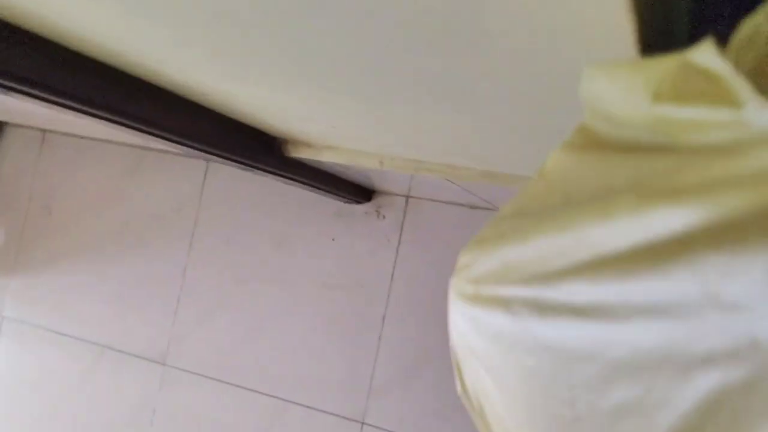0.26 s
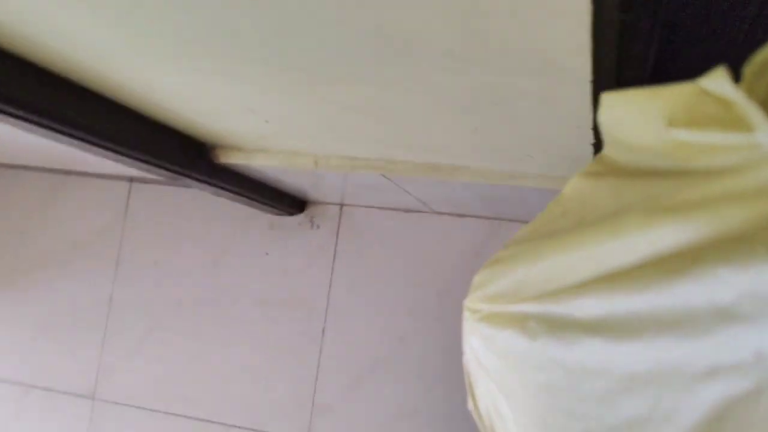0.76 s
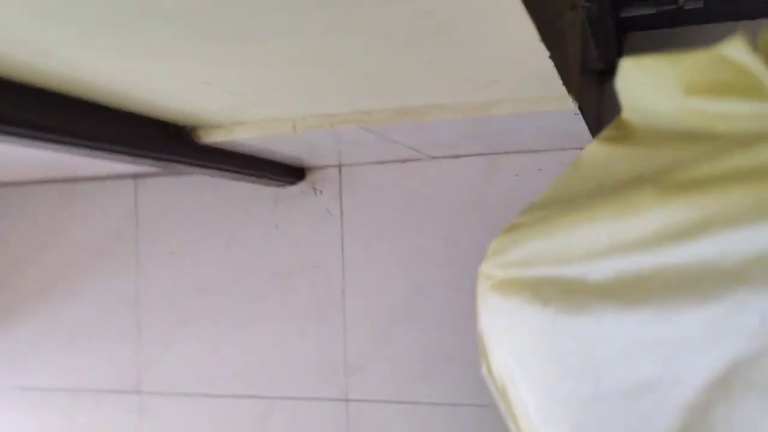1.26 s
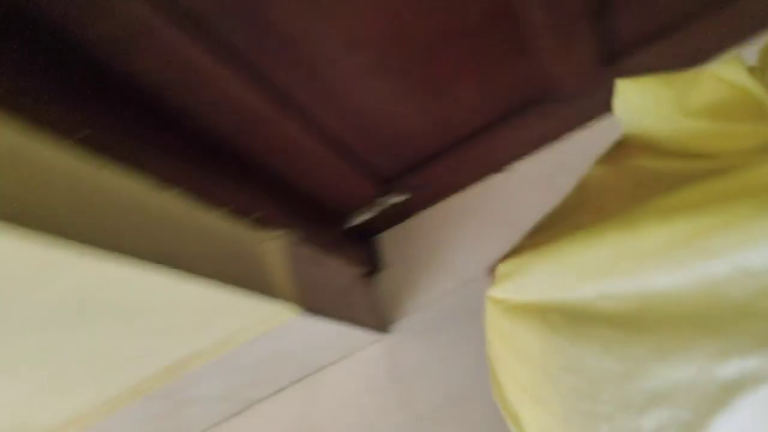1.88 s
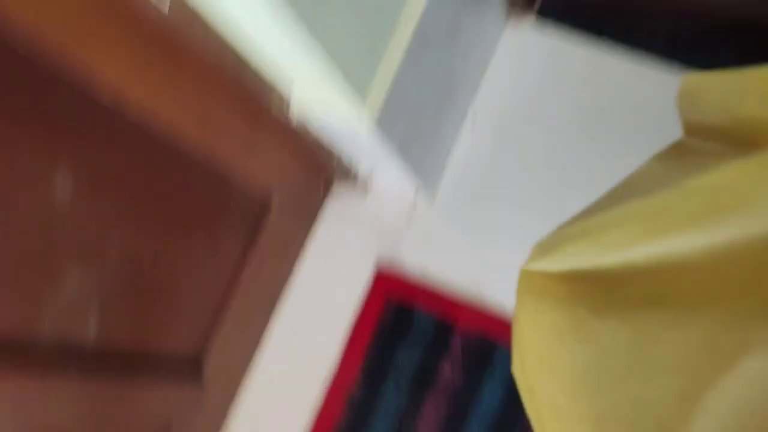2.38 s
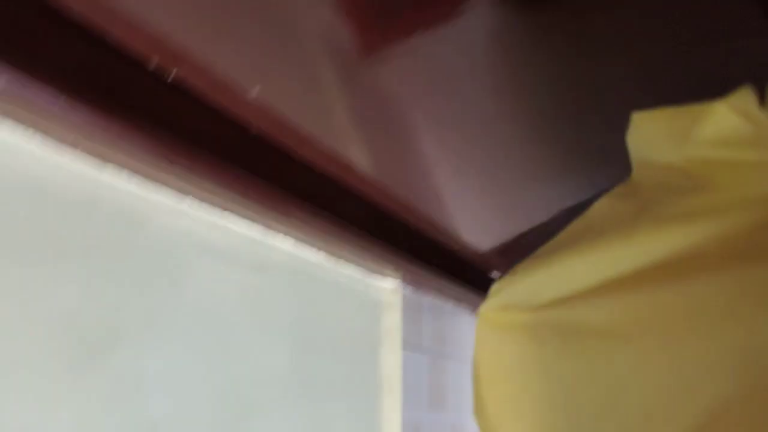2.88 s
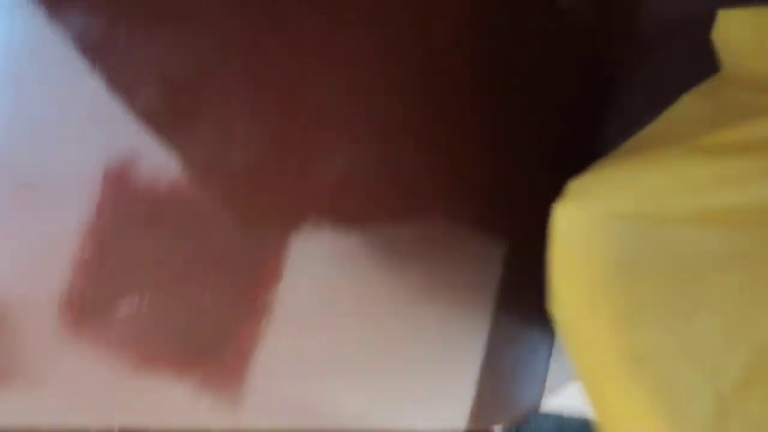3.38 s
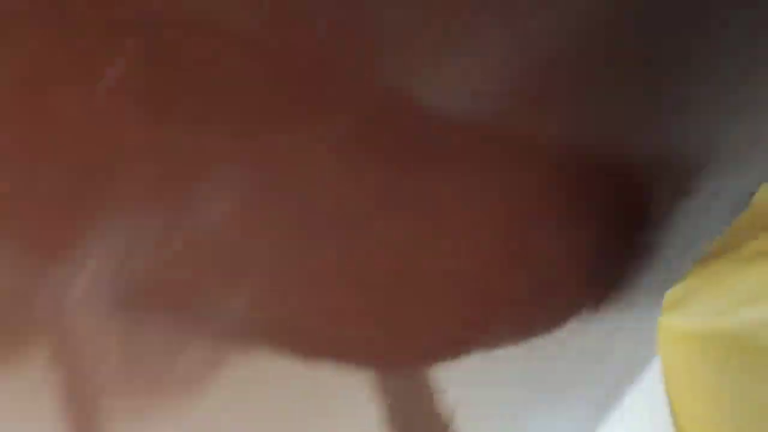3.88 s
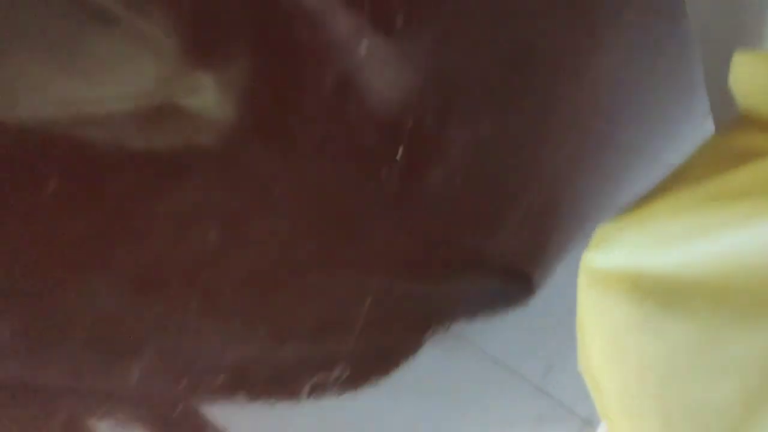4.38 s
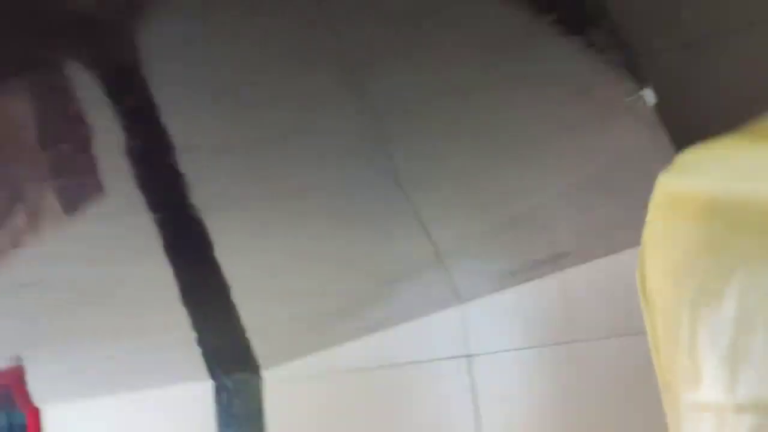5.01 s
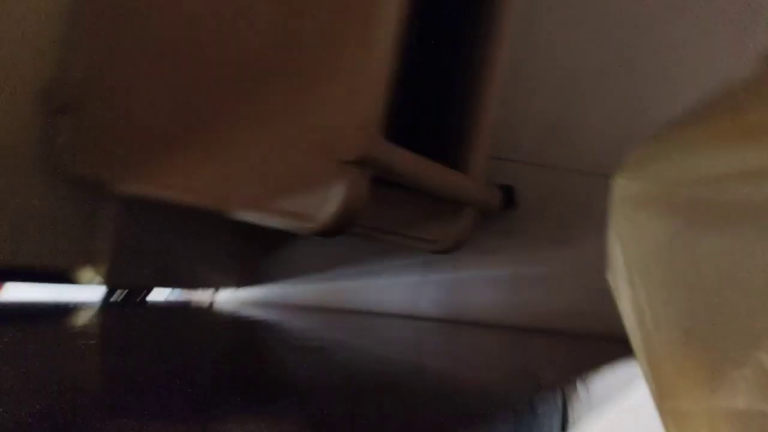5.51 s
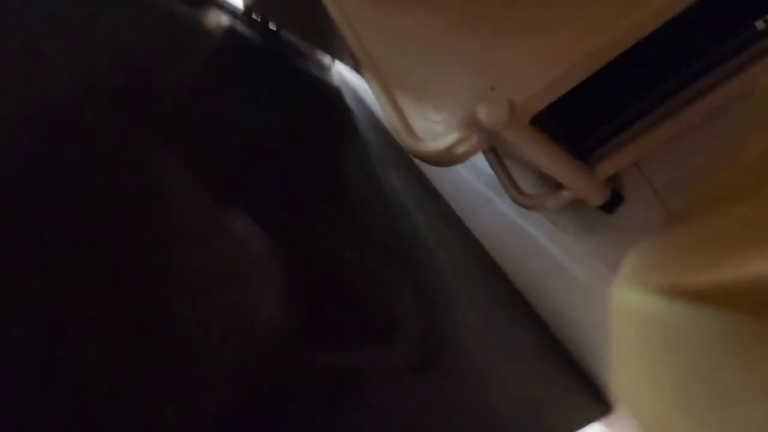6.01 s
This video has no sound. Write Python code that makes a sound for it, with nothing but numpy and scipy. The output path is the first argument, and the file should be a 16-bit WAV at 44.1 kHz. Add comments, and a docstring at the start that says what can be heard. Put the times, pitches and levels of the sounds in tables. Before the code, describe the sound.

Cloth rasps at the microphone, a latch snaps and a wooden door bangs in a tiled hall, its bolt grinds home, then keys jingle faintly.

```python
"""Doors and keys in a tiled hall

A latch snaps, a wooden door bangs shut, its bolt grinds home and a second door bumps: rattles plus ringing modes.
Keys jangle as knocked modes; a cloth bag rubs, swishes and crackles at the microphone as filtered slip noise.
Random echoes make the hall; low swells, soft thumps, rumble and air noise lie underneath."""
import sys
import numpy as np
from scipy import signal
from scipy.fft import rfft, irfft
from scipy.io import wavfile
from scipy.ndimage import uniform_filter1d

SR = 44100
rng = np.random.default_rng(int(sys.argv[2]) if len(sys.argv) > 2 else 0)


def transcribe(signal):
    """Save signal, clipped to [-1, 1], as a 16-bit WAV file at the path in sys.argv[1]."""
    frames = np.atleast_2d(signal).T
    limited = np.clip(frames, -1, 1)
    pcm = np.round(limited * 32767).astype(np.int16)
    wavfile.write(sys.argv[1], SR, pcm)


N = 275625
TIME = np.arange(N) / SR
PORT_LAG = 14  # samples, left port behind right

# modes of the struck parts: pitch_hz, level_db, t60_s
LATCH = [(2013, -9, .07), (2676, -10, .07), (5600, -7, .03), (6298, -3, .06), (6600, 0, .12),
         (6858, 0, .14), (7050, -7, .06), (13490, -13, .05)]
DOOR = [(54, -17, .6), (132, -2, .5), (180, -1, .38), (221, 1, .42), (258, -6, .3), (328, -9, .4),
        (470, -7, .25), (630, -11, .35), (732, -9, .35), (824, -9, .35), (915, -7, .27)]
SECOND_DOOR = [(87, 0, .42), (91, -4, .36), (188, -9, .25), (323, -22, .3), (420, -16, .25),
               (495, -18, .25)]
FRAME = [(272, 0, 0.22), (310.2, -4.5, 0.26), (847, 1, .12)]
STRIKE_PLATE = [(3780, -7.5, 0.038), (4270, 1.5, 0.022), (4960, -2, 0.059), (5100, -2.5, .025),
                (5710, -9, 0.039), (6460, -15.5, .03)]
BOLT = [(2150, -4, .022), (2350, 0, .025), (2560, -1, .022), (2850, -5, .02)]
# short rattle of wood and metal in every blow: freq_hz, density_db_per_hz
RATTLE = [(45, -6), (120, 0), (300, -5), (600, 0), (1200, -1.5), (2500, -4.5), (5000, -17), (12000, -24)]
# blows on doors and lock:
# start_s, rattle_db, hardness_db_per_octave, fade_s, left_right_db, ring_db, part
DOOR_BLOWS = [(0.7324, -13, 2.4, 0.0075, -9, -25.5, LATCH), (.767, -25, -3.5, 0.0089, -5, -26.5, FRAME),
              (0.9715, -11.5, 0.5, 0.011, -6, -24, FRAME), (.995, -10, -2, 0.014, -0.5, -15, DOOR),
              (1.0182, -14, -2, .01, -6, -15, STRIKE_PLATE), (1.4097, -12, 1.8, 0.0058, -2.5, -11.5, BOLT),
              (2.7214, -18, 4, 0.0049, 1, -21, SECOND_DOOR), (2.725, -19, -3, .014, -3.5, -22.5, BOLT)]


def doors():
    """Each blow rattles, brighter the harder the contact, and leaves a part ringing; returns both layers."""
    rattles, rings = np.zeros((2, N)), np.zeros((2, N))
    t = np.arange(8192) / SR
    for start_s, rattle_db, hardness_db, fade_s, pan_db, ring_db, part in DOOR_BLOWS:
        spectrum = [(hz, band_db + hardness_db * np.log2(hz)) for hz, band_db in RATTLE]
        rattle = evened(colour(rng.standard_normal((2, len(t))), spectrum))
        rattle = rattle * np.exp(-t / fade_s) * (1 - np.exp(-t / 0.0013))
        add(rattles, start_s, gain_of(rattle_db) * sides(pan_db) * rattle)
        lowest_hz = part[0][0]
        tone = ring(part, rise_s=1 / (np.pi * lowest_hz))
        add(rings, start_s, gain_of(ring_db) * sides(pan_db) * tone)
    return rattles, rings


def ring(modes, rise_s, buzz_share=0.032, buzz=0.61):
    """Dying modes that waver, the high ones more, as the part rattles; the left port hears them later."""
    t = np.maximum(np.arange(SR) - np.array([[PORT_LAG], [0]]), 0) / SR
    out = np.zeros((2, SR))
    for hz, db, t60_s in modes:
        buzzing = waver(SR, width_hz=buzz_share * hz + 6, depth=buzz * hz / (hz + 600))
        decay = gain_of(db - 60 * t / t60_s)
        out += (decay * np.exp(2j * np.pi * hz * t) * buzzing).imag
    return out * (1 - np.exp(-t / rise_s))


# metal sliding in the lock: start_s, length_s, grind_db, hiss_db
SLIDES = [(0.918, 0.12, -32.5, -44), (1.306, 0.14, -34.5, -52), (1.406, 0.062, -25, -42),
          (1.46, 0.1, -31, -38), (1.732, 0.069, -44, -36), (2.589, 0.088, -40.5, -40.5)]
# grinding spectrum: freq_hz, density_db_per_hz
GRIND = [(88, -48), (150, -2), (330, -7.5), (485, -9), (770, -2.5), (832, -4), (941, -6.5), (1170, -11),
         (1910, -8), (6000, -28), (7800, -49.5), (13200, -120)]


def sliding(fullness=0.82):
    """The bolt and the catches grind along their guides."""
    hiss_spectrum = [(2000, 4), (4500, -3), (9000, -2.5), (15000, -3.5)]  # freq_hz, density_db_per_hz
    grind = friction(GRIND, slips_per_s=1600, spread_db=2.0, smooth=0.84, flutter_db=2.5)
    hiss = friction(hiss_spectrum, slips_per_s=1600, spread_db=-0.5, smooth=0.78, flutter_db=2.5)
    out = np.zeros((2, N))
    for start_s, length_s, grind_db, hiss_db in SLIDES:
        scrape = gain_of(grind_db) * grind + gain_of(hiss_db) * hiss
        out += arch(start_s, length_s, fullness) * scrape
    return sides(-3) * out


# modes of the keys: pitch_hz, level_db, t60_s
SMALL_KEY = [(9400, -14, .03), (10890, -1, .17), (11860, -4, .06), (12080, -9, .07), (12510, 0, .11),
             (12650, -5, .09), (13200, -15, .05), (15600, -19, .06)]
LONG_KEY = [(7380, -8, .13), (7820, -4, .11), (11350, -7, .11), (11580, -10, .1), (12490, -4, .14),
            (13550, -5, .13), (14890, -2, .2)]
KEY_RING = [(5060, -11, .08), (9950, -3, .11), (11200, -8, .08)]
# shakes of the keys: start_s, level_db, settle_s, brightness_db_per_octave, left_right_db, key
JANGLES = [(1.778, -63, .035, 49, -9, LONG_KEY), (1.847, -53.5, .012, -7, -9, KEY_RING),
           (1.891, -51, .012, -1, -7.5, KEY_RING), (1.96, -73, 0.041, 42.5, -5, LONG_KEY),
           (2.562, -42, 0.027, -9, -3, SMALL_KEY), (2.611, -47, 0.089, 31, 2, SMALL_KEY),
           (2.87, -66.5, 0.058, -10, 2, LONG_KEY), (3.262, -60, .1, 3.5, -1, LONG_KEY),
           (3.331, -49.5, 0.033, 0, 7, LONG_KEY), (3.419, -53.5, 0.03, -7, 2, LONG_KEY),
           (3.784, -72.5, 0.13, 24, 10, SMALL_KEY), (3.898, -58.5, 0.095, 1, 7, SMALL_KEY),
           (4.065, -53, 0.09, -6, 6, SMALL_KEY), (4.792, -57.5, 0.059, 9.5, -10.5, LONG_KEY),
           (5.274, -48.5, 0.2, 17, -5, SMALL_KEY), (5.79, -48, 0.018, 28, -13, LONG_KEY),
           (5.835, -49, 0.019, -14, -1, LONG_KEY), (5.914, -57.5, 0.043, 9, -6, LONG_KEY),
           (6.1163, -62.5, 0.017, 2, 3, SMALL_KEY), (6.21, -51.5, 0.025, -18, -3, SMALL_KEY)]
KNOCK_GAP_S = .02  # mean


def keys(uneven_db=4, detune=0.0032, tick_db=-5, count=7):
    """A shaken key knocks ever softer on its neighbours; each contact ticks and reweights its modes."""
    out, t = np.zeros((2, N)), np.arange(10000) / SR
    for start_s, db, settle_s, tilt_db, pan_db, key in JANGLES:
        hz, mode_db, t60_s = np.transpose(key)[:, :, None]
        hz = hz * (1 + detune * rng.standard_normal(hz.shape))
        decay = gain_of(mode_db + tilt_db * np.log2(hz / 12000) - 60 * t / t60_s)
        tones = decay * np.exp(2j * np.pi * hz * t)
        tones *= waver(tones.shape, width_hz=90, depth=.9) * (1 - np.exp(-t / .001))
        gaps_s = KNOCK_GAP_S * (.5 + rng.random(count))
        for delay_s in np.cumsum(gaps_s) - gaps_s[0]:
            sizes = gain_of(uneven_db * rng.standard_normal((2, len(key))))
            weights = sizes * np.exp(2j * np.pi * rng.random((2, len(key))))
            bright_noise = np.diff(rng.standard_normal((2, len(t) + 1)))
            tick = gain_of(tick_db) * bright_noise * np.exp(-t / 0.0097)
            knock = (weights @ tones).real + tick
            knock_gain = gain_of(db) * np.exp(-delay_s / settle_s)
            add(out, start_s + delay_s, knock_gain * sides(pan_db) * knock)
    return out


# first the second door's wash in the hall, then bag strokes, swinging with the walk:
# start_s, length_s, rub_db, swish_db, left_right_db
BRUSHES = [(2.882, 0.47, -54.5, -84, -2.5), (3.293, 0.22, -51.5, -60.5, -13),
           (3.499, 0.25, -53.5, -63, -5.5), (3.777, 0.25, -53.5, -54, -9.5),
           (4.054, 0.25, -51, -46.5, -14.5), (4.332, 0.11, -55.5, -61.5, -24),
           (4.432, 0.28, -60, -64, -18.5), (4.625, .28, -60, -53.5, -14), (4.902, 0.28, -62, -47, -18),
           (5.156, 0.18, -50, -53.5, -2), (5.271, .25, -45.5, -41.5, -17.5), (5.508, 0.2, -47, -39.5, -11),
           (5.663, 0.23, -44, -42.5, -18), (6.11, 0.035, -51, -53, -22), (6.17, 0.16, -63, -55, -14)]
# cloth spectra: freq_hz, density_db_per_hz
RUB = [(60, -14.5), (150, -0.5), (300, 2.5), (600, 1), (820, 1), (1150, -6.5), (1600, -10), (2600, -8.5),
       (4000, -21), (6500, -24), (11000, -63)]
SWISH = [(1500, -15.5), (3000, -9.5), (5000, -5.5), (6800, 2.5), (9500, 2), (12500, 3), (15500, 0)]


def bag(rub_pan_db=0, swish_pan_db=-1, crease_db=-5, fullness=0.71):
    """Cloth swishes and its folds rub, coarser, and crackle; the first arch stands for the second door's wash."""
    rub = friction(RUB, slips_per_s=630, spread_db=4.0, smooth=1.0, flutter_db=2.5)
    swish = friction(SWISH, slips_per_s=880, spread_db=-3.0, smooth=1.7, flutter_db=1.74)
    crackle, out = creases(), np.zeros((2, N))
    for start_s, length_s, rub_db, swish_db, pan_db in BRUSHES:
        crackle_db = (rub_db + swish_db) / 2 + crease_db
        folds = gain_of(rub_db) * rub + gain_of(crackle_db) * crackle
        stroke = folds * sides(pan_db + rub_pan_db)
        stroke = stroke + gain_of(swish_db) * swish * sides(pan_db + swish_pan_db)
        out += arch(start_s, length_s, fullness) * stroke
    return out


def creases(per_s=22, spread_db=3, fade_s=0.003):
    """Small folds of cloth snap over at random."""
    sizes = gain_of(spread_db * np.minimum(rng.exponential(1, N), 3)) * (rng.random(N) < per_s / SR)
    envelope = signal.lfilter([1], [1, -np.exp(-1 / (fade_s * SR))], sizes)
    snaps = envelope * rng.standard_normal((2, N))
    return evened(colour(snaps, [(200, 13), (1000, 4.5), (3000, -0.5), (7000, 5), (15000, 6)]))


# bag dragging along the right port while the door is pulled: time_s, rub_db, swish_db
DRAG = [(0.0, -65.5, -73), (0.188, -38.5, -42), (0.431, -45, -61.5), (0.508, -42, -62), (0.646, -36, -51.5),
        (0.722, -45, -63.5)]
# rasp spectrum: freq_hz, density_db_per_hz
DRAG_RUB = [(60, -33), (120, -7), (300, -1), (700, -0.5), (1100, -2), (1800, -8), (2700, -13.5),
            (4000, -22.5), (7000, -30.5), (12000, -56)]


def drag(rub_pan_db=-25, swish_pan_db=-16):
    """Taut cloth slides right over one port: a fine, even rasp."""
    time_s, rub_db, swish_db = np.transpose(DRAG)
    rub = friction(DRAG_RUB, slips_per_s=3000, spread_db=2.5, smooth=0.7, flutter_db=2.5)
    swish = friction(SWISH, slips_per_s=4000, spread_db=1, smooth=1.5, flutter_db=.8)
    rasp = rub * level(time_s, rub_db) * sides(rub_pan_db)
    return rasp + swish * level(time_s, swish_db) * sides(swish_pan_db)


# loudest snaps of the bag's folds: start_s, level_db, mid_vs_treble_db
CLICKS = [(2.494, -45, -12), (3.5977, -41, -14), (3.9739, -34.5, -14), (4.5727, -39, 5), (4.6004, -44, -26),
          (5.3409, -34, -11), (5.3855, -25.5, -34), (5.416, -26.5, -24), (5.669, -22, -32),
          (5.8092, -23.5, -31), (5.8381, -29.5, -10), (5.9345, -32, -3), (6.083, -33.5, -14.5),
          (6.0987, -31.5, -10), (6.1855, -41, -17)]


def clicks(pan_db=-15, fade_s=0.0012):
    """Folds snap as dry ticks, some dull and some bright."""
    out, t = np.zeros((2, N)), np.arange(1024) / SR
    for start_s, db, mid_db in CLICKS:
        spectrum = [(150, mid_db - 0.5), (700, mid_db + 17.5), (3000, mid_db + 14), (7000, 4.5), (15000, -5)]
        tick = evened(colour(rng.standard_normal((2, len(t))), spectrum)) * np.exp(-t / fade_s)
        add(out, start_s, gain_of(db) * sides(pan_db) * tick)
    return out


# low swells: air and hand shaking the microphone; at 1.1 and 2.97 the doors' boom in the hall:
# start_s, length_s, level_db, left_right_db
SWELLS = [(0.068, 0.75, -56, -38.5), (1.1, .8, -46.5, -3.5), (2.97, 0.27, -55.5, 1),
          (3.323, 0.18, -46, -16), (3.4, 0.42, -46, 19), (3.72, 0.6, -57, -12), (3.832, .19, -43.5, 37),
          (5.176, 0.34, -56, -25), (5.592, 0.29, -49.5, -33)]
# soft footfalls and bumps of the hand: start_s, level_db, time_to_peak_s, left_right_db
THUMPS = [(0.755, -26, 0.015, -11), (0.847, -38, 0.061, 0), (1.75, -45, .011, -17),
          (2.34, -42.5, 0.018, -16.5), (2.62, -31, 0.047, 0), (3.524, -19.5, 0.006, 29),
          (4.598, -38, 0.014, -18), (4.901, -31, 0.0093, -21)]
# spectra: freq_hz, density_db_per_hz
RUMBLE = [(25, -25), (45, -8), (65, 2), (90, -1.5), (120, 1.5), (190, -16.5), (430, -30), (1100, -54)]
THUMP = [(30, -24), (70, 5), (100, 4.5), (140, -7), (250, -18.5), (600, -37.5), (2000, -78)]


def lows(steady_db=-66, fullness=0.62):
    """A steady rumble grows with each low swell; soft thumps rise and die over it."""
    rumble_gain = gain_of(steady_db)
    for start_s, length_s, db, pan_db in SWELLS:
        rumble_gain = rumble_gain + gain_of(db) * sides(pan_db) * arch(start_s, length_s, fullness)
    out = noise(RUMBLE) * rumble_gain
    t = np.arange(12000) / SR
    for start_s, db, peak_s, pan_db in THUMPS:
        push = evened(colour(rng.standard_normal((2, len(t))), THUMP))
        add(out, start_s, gain_of(db) * sides(pan_db) * push * t / peak_s * np.exp(-t / peak_s))
    return out


# hall decay: freq_hz, t60_s
HALL_T60 = [(80, 1.09), (300, 0.91), (1000, 0.5844), (2500, 0.66), (5000, 0.35), (12000, 0.5)]
# hall echo level: freq_hz, level_db
HALL_DB = [(80, 4), (300, 5), (1000, 1), (2500, -3.5), (5000, 0), (12000, -3.5)]


def hall(x, early_db=4, early_s=0.023):
    """Random echoes off tile: strong near ones, then a tail whose decay time varies with frequency."""
    taps = rng.standard_normal((2, SR)) * (rng.random((2, SR)) < 4000 / SR)
    hz, t, z = signal.stft(evened(colour(taps, HALL_DB)), SR, nperseg=256)
    late = gain_of(-60 * t / read(HALL_T60, hz)[:, None])
    early = gain_of(early_db) * np.exp(-t / early_s)
    tail = signal.istft(z * (late + early), SR, nperseg=256)[1][:, :SR]
    tail = tail * (1 - np.exp(-TIME[:SR] / 0.0061))
    return signal.fftconvolve(x, tail / np.sqrt(np.sum(tail ** 2) / 2), axes=1)[:, :N]


# air noise spectrum: freq_hz, density_db_per_hz
AIR = [(25, -9.5), (110, -9.5), (230, -6.5), (400, -13.5), (1300, -17), (2200, -20.5), (3000, -21),
       (3600, -22.5), (8000, -29), (16000, -30)]
AIR_DB = -64.5


def air():
    """Steady background noise."""
    return gain_of(AIR_DB) * noise(AIR)


def noise(spectrum):
    """Steady stereo noise of unit rms."""
    return evened(colour(rng.standard_normal((2, N)), spectrum))


def friction(spectrum, slips_per_s, spread_db, smooth, flutter_db):
    """Tiny uneven slips over a smooth hiss, bunched as the surfaces catch and let go."""
    sizes = gain_of(spread_db * np.minimum(rng.exponential(1, N), 4)) * (rng.random(N) < slips_per_s / SR)
    slips = evened(sizes * rng.standard_normal((2, N))) + smooth * rng.standard_normal((2, N))
    catching = uniform_filter1d(uniform_filter1d(rng.standard_normal(N), size=500), size=200)
    return evened(colour(slips, spectrum) * gain_of(flutter_db * evened(catching)))


def waver(shape, width_hz, depth):
    """Complex gains round 1 that wander at about width_hz, as loose metal buzzes and turns."""
    z = rng.standard_normal(shape) + 1j * rng.standard_normal(shape)
    z = signal.sosfilt(signal.butter(2, width_hz, fs=SR, output="sos"), z)
    return (1 + depth * evened(z)) / np.sqrt(1 + depth ** 2)


def arch(start_s, length_s, fullness):
    """The gain of one stroke or swell: it rises from silence and sinks to silence again."""
    phase = (TIME - start_s) / length_s
    inside = (phase > 0) & (phase < 1)
    out = np.zeros(N)
    out[inside] = np.sin(np.pi * phase[inside]) ** abs(fullness)
    return out


# likeness of the two ports: freq_hz, left_right_correlation
LIKENESS = [(150, 0.96), (300, 0.93), (600, 0.35), (1200, 0.35), (4000, 0.05), (15000, 0.19)]


def colour(pair, spectrum):
    """Filters two unrelated noises; long waves reach both ports alike, the left a little later."""
    hz, z = np.fft.rfftfreq(pair.shape[1], 1 / SR), rfft(pair)
    same = np.clip(read(LIKENESS, hz), 0, 1)
    lag = np.exp(-2j * np.pi * hz * PORT_LAG / SR)
    left = same * z[1] * lag + np.sqrt(1 - same ** 2) * z[0]
    low_cut = hz ** 2 / (hz ** 2 + 30 ** 2)
    return irfft(np.array([left, z[1]]) * gain_of(read(spectrum, hz)) * low_cut, pair.shape[1])


def gain_of(db):
    """Decibels to amplitude."""
    return 10 ** (np.asarray(db) / 20)


def evened(x):
    """Scales to unit rms."""
    return x / np.sqrt(np.mean(x ** 2) + 1e-20)


def read(points, hz):
    """Reads a table on a log-frequency axis."""
    f, value = np.transpose(points)
    return np.interp(np.log(hz + 1), np.log(f + 1), value)


def level(time_s, db):
    """A gain curve through points in dB, silent outside them."""
    return gain_of(np.interp(TIME, time_s, db, left=-140, right=-140))


def add(mix, start_s, sound):
    """Mixes a stereo sound in at start_s."""
    part = mix[:, round(start_s * SR):][:, :sound.shape[1]]
    part += sound[:, :part.shape[1]]


def sides(pan_db):
    """Left and right gains of unit mean power."""
    pair = gain_of(np.array([pan_db, -pan_db]).reshape(2, -1) / 2)
    return pair / np.sqrt(np.mean(pair ** 2, 0))


def scene():
    """Doors fill the hall; keys and bag are close and drier."""
    blows, parts = doors()
    jangle, slide, tick = keys(), sliding(), clicks()
    cloth = bag() + drag()
    sent = gain_of(-1.5) * blows + gain_of(-9.0) * parts + gain_of(-7.0) * jangle
    sent = sent + gain_of(-10) * slide + gain_of(-8.5) * tick + gain_of(-16.5) * cloth
    close = blows + parts + jangle + slide + tick + cloth
    close = close + drag()  # a second layer of rasp, without echo
    return close + hall(sent) + lows() + air()


CEILING = .9  # recorder saturation, full scale 1
EDGE_HZ = 15950


def record(dry):
    """The recorder rounds off the highest peaks, then limits the band steeply."""
    held = dry / (1 + (dry / CEILING) ** 4) ** .25
    lowpass = signal.firwin(401, EDGE_HZ, window=("kaiser", 8), fs=SR)
    return signal.oaconvolve(held, lowpass[None], "same")


dry = scene()
out = record(dry)
transcribe(out)
```